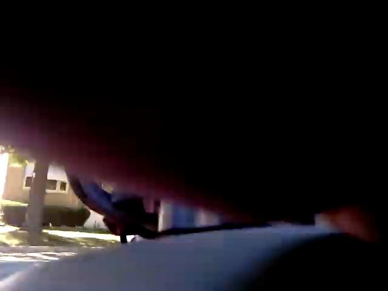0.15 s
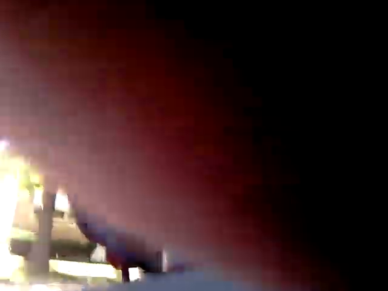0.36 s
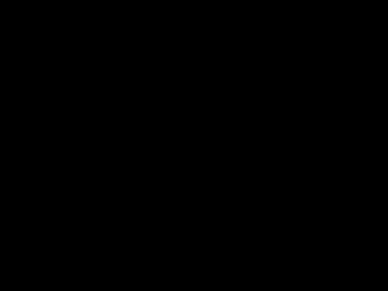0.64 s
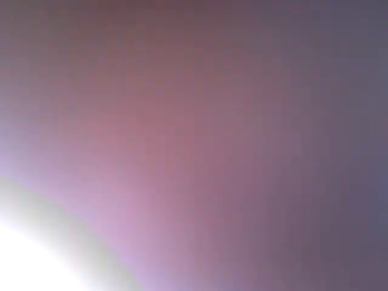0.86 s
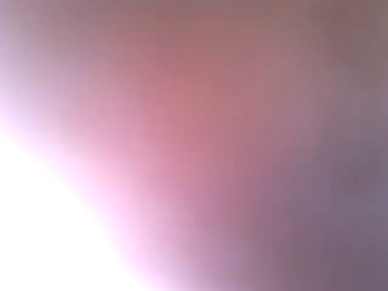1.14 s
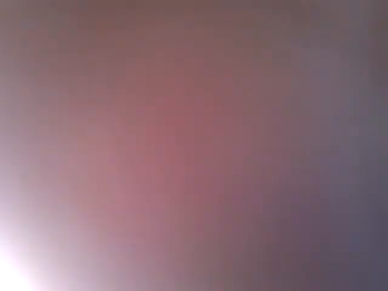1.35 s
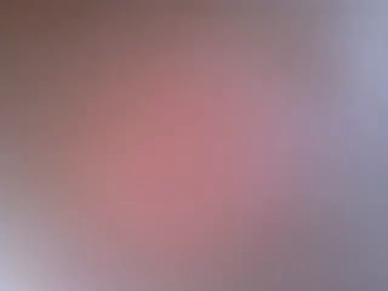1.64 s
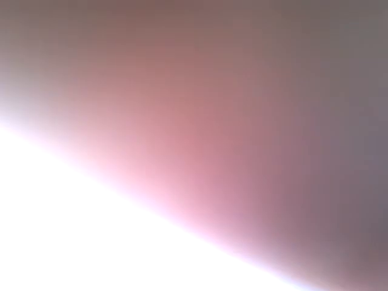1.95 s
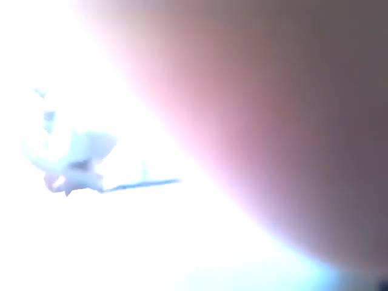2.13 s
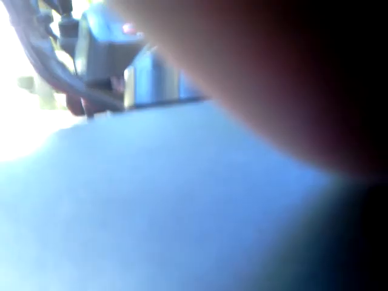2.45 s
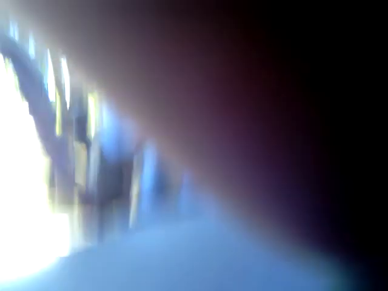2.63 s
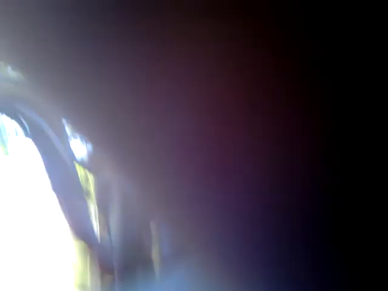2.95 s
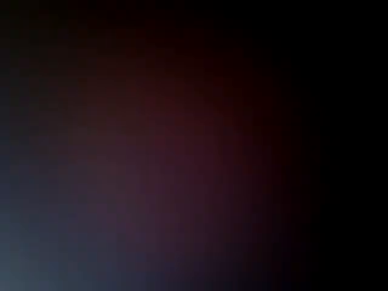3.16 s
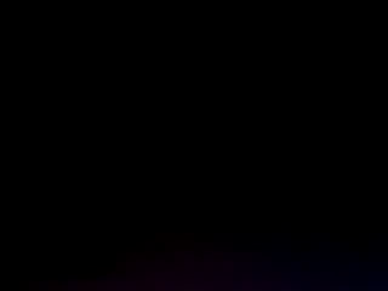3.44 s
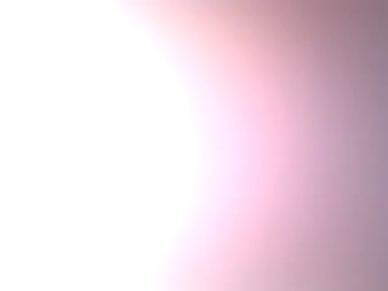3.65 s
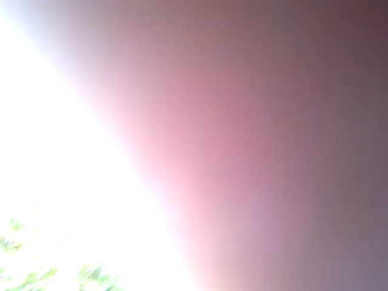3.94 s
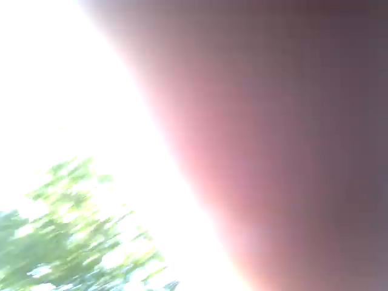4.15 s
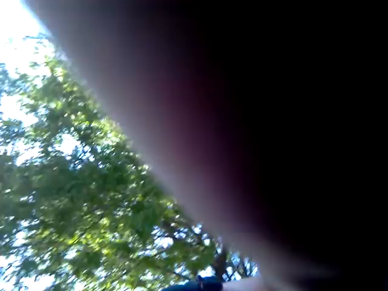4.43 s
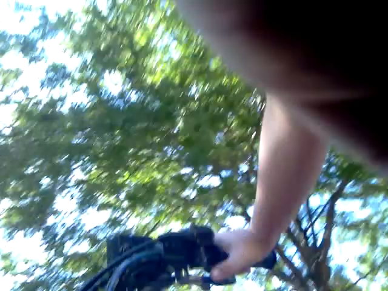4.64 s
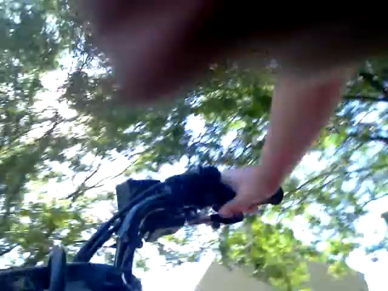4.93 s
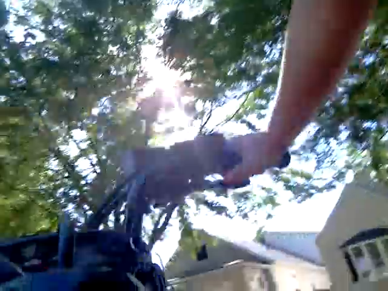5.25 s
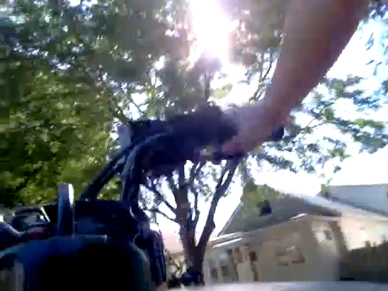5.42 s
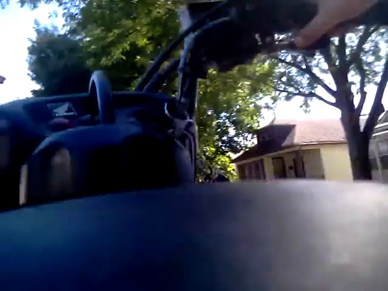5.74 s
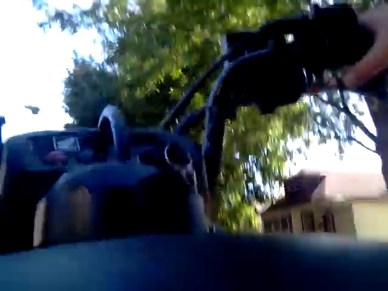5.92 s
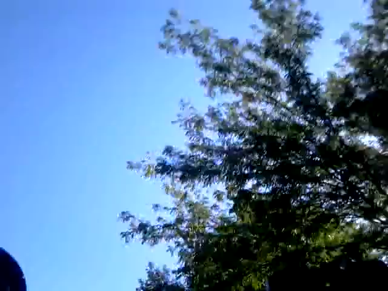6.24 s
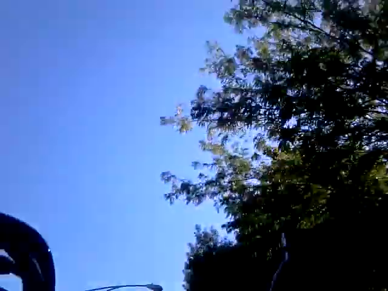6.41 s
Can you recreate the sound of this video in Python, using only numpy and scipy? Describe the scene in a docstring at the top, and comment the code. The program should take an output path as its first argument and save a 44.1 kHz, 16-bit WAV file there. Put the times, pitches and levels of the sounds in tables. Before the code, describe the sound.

Lumpy four-stroke quad idle outdoors, throttle blips and a rising barking rev, with fingers bumping and rubbing a cheap, overloading microphone.

```python
"""A single-cylinder four-stroke quad idles outdoors, is blipped once, then revs up and pulls away.
Each firing excites silencer and tailpipe resonances, and noise bursts roughen its bark.
Crank harmonics shake the bodywork; noise and pulses through resonances make the valve gear clatter.
A small narrow-band camera is handled close by: shaped noise rubs and scrapes, and dying tones knock.
Loud moments overload its input, which clips, folds and fizzes."""
import sys
import numpy as np
from scipy import signal
from scipy.fft import rfft, irfft, next_fast_len
from scipy.io import wavfile
from scipy.ndimage import uniform_filter1d, minimum_filter1d, map_coordinates

SR = 44100
rng = np.random.default_rng(int(sys.argv[2]) if len(sys.argv) > 2 else 0)


def unload_wav(signal):
    """Save mono or channel-first audio to the path in sys.argv[1] as 16-bit WAV at rate SR, clipped to [-1, 1]."""
    wavfile.write(
        sys.argv[1],
        SR,
        np.round(np.clip(np.atleast_2d(signal).T, -1, 1) * 32767).astype(np.int16),
    )


N = 290178  # length [samples]

# tailpipe resonances: (centre [Hz], width [Hz], level [dB])
TAILPIPE_MODES = [(80, 14, -9), (132, 22, -4), (161, 12, 0)]
# intake airbox resonances: (centre [Hz], width [Hz], level [dB])
AIRBOX_MODES = [(692, 23, 8.5), (1446, 30, 12.5), (2150, 14, 10.5), (2330, 31, 9.5), (2770, 40, -4),
                (2810, 33, 0), (3195, 150, 1)]
# spectrum of the clatter and intake rush: (frequency [Hz], level [dB per Hz])
RATTLE_SPECTRUM = [(150, -38), (450, 4), (750, 3), (1050, 3), (1700, -0.5), (2300, -3), (3000, 0),
                   (3700, -5), (5000, -10.5)]


def amp(db):
    """Decibels to gain."""
    return 10 ** (np.asarray(db) / 20)


def unit(x):
    """Scaled to rms 1."""
    return x / np.sqrt(np.mean(x ** 2) + 1e-20)


def steady(x):
    """Held near rms 1 over a sliding fraction of a second, whatever the firing rate."""
    power = uniform_filter1d(uniform_filter1d(x * x, size=SR // 5), size=SR // 5)
    return x / np.sqrt(np.abs(power) + 1e-20)


def curves(rows):
    """One value per sample for each column after the time."""
    s, *cols = np.transpose(rows)
    return [np.interp(np.arange(N) / SR, s, c) for c in cols]


def wobble(rate):
    """A smooth random curve, rate knots a second."""
    knots = rng.standard_normal(int(N * rate / SR) + 4)
    return map_coordinates(knots, [np.arange(N) * rate / SR])


def filtered(x, response):
    """x times a complex response of frequency."""
    m = next_fast_len(N + SR // 2)
    return irfft(rfft(x, m) * response(np.fft.rfftfreq(m, 1 / SR)), m)[:N]


def soft(x, hz):
    """x through a gentle low-pass without phase shift, 6 dB down at hz."""
    return filtered(x, lambda f: 1 / (1 + (f / hz) ** 4))


def coloured(x, points):
    """x through a spectrum of (Hz, dB) points."""
    f, db = np.transpose(points)
    return filtered(x, lambda hz: amp(np.interp(np.log(hz + 1), np.log(f), db)))


def ring(x, modes):
    """x through a set of resonances of alternating sign."""
    def response(f):
        total = 0
        for k, (hz, width, db) in enumerate(modes):
            damping = 1j * f * width
            total = total + (-1) ** k * amp(db) * damping / (hz * hz - f * f + damping)
        return total
    return filtered(x, response)


def pulses(cycle, at, scatter_db, jitter):
    """One impulse per cycle at the given fraction of it, uneven in size and timing [s]."""
    beats = np.arange(np.ceil(cycle[-1]))
    size, shift = rng.standard_normal((len(beats), 2)).T
    where = np.interp(beats + at, cycle, np.arange(N)) + jitter * SR * shift
    return np.bincount(np.clip(where, 0, N - 1).astype(int), amp(scatter_db * size), N)


def puffs(train, t60):
    """Every impulse lets out a dying burst of turbulence."""
    envelope = signal.lfilter([1], [1, -amp(-60 / (t60 * SR))], train)
    return unit(envelope * rng.standard_normal(N))


def baffled(train, t60):
    """Echoes between the silencer's baffles smear every pulse alike, nearly keeping its colour."""
    t = np.arange(SR // 8) / SR
    echoes = rfft(rng.standard_normal(len(t)) * amp(-60 * t / t60))
    # flattened spectrum: only the echoes' phases remain
    smear = irfft(echoes / np.abs(echoes), len(t))[:SR // 16]
    return unit(signal.fftconvolve(train, smear)[:N])


def exhaust(cycle, speed, boom_db, drone_db, bark_db):
    """Each blow-down rings the silencer and tailpipe; its gas jet roughens the higher resonances."""
    # silencer resonances: (centre [Hz], width [Hz], level [dB])
    silencer_modes = [(88.2, 12, 2.5), (109, 12, -11.5)]
    # broad second chamber that rounds off each thump: (centre [Hz], width [Hz], level [dB])
    outlet_modes = [(97, 44, 0)]
    # bark resonances, which change with the gas flow:
    # (centre [Hz], width [Hz], level at low speed [dB], level at high speed [dB])
    bark_modes = [(189, 79, -3.5, 1), (283.4, 56, 3, 3), (341.8, 47, 2.5, 1), (426, 26.5, 0, 3.5),
                  (575, 160, -5.5, -8), (683.5, 90, -4, -5), (930, 620, -13.5, -13.5)]
    hot_lead = .08  # hot gas leaves this share of a cycle earlier
    echo_s, echo_db = .0106, -3
    stroke_hz = 480  # well above this the bark is turbulence; below, turbulence grows with speed

    effort = np.clip((speed - 10) / 16, 0, 1)
    heat = np.clip((speed - 10) / 6, 0, 1)
    fast = np.clip((speed - 19) / 6, 0, 1)
    stroke = cycle + hot_lead * heat
    fire = pulses(stroke, at=-.1, scatter_db=1.2, jitter=.00014)
    # the piston pushes out the rest
    sweep = pulses(stroke, at=.4, scatter_db=1.5, jitter=.00015)

    push = amp(-15.0) * puffs(fire, t60=0.37) - unit(fire)
    # hotter gas raises the silencer's note
    hot_modes = [(hz * 1.161, width, db) for hz, width, db in silencer_modes]
    chamber = ring(push * (1 - heat), silencer_modes) + ring(push * heat, hot_modes)
    boom = steady(soft(ring(chamber, outlet_modes), hz=300))

    pipe_push = baffled(fire + effort * sweep / 3, t60=.08) + amp(-14) * puffs(fire, t60=.1)
    drone = steady(soft(ring(pipe_push, TAILPIPE_MODES), hz=330))

    # at low effort each chug comes back once from the end of the pipe
    returned = filtered(fire * (1 - effort),
                        lambda f: amp(echo_db) * np.exp(-2j * np.pi * f * echo_s))
    strokes = baffled(fire + returned, t60=.11)
    strokes = strokes + amp(-4.5) * effort ** 2 * baffled(sweep, t60=.1)

    # every firing tears the gas differently; with speed a continuous jet joins the puffs
    jet = pulses(cycle, at=-.05, scatter_db=2, jitter=.001)
    gas = amp(-4 + 2 * fast) * puffs(jet, t60=.11) + amp(-14 + 9 * fast) * rng.standard_normal(N)
    flow = soft(strokes, stroke_hz) + gas - (.8 - .35 * fast) * soft(gas, stroke_hz)
    slow_modes = [(hz, width, low_db) for hz, width, low_db, _ in bark_modes]
    fast_modes = [(hz, width, high_db) for hz, width, _, high_db in bark_modes]
    voiced = ring(flow * (1 - fast), slow_modes) + ring(flow * fast, fast_modes)
    bark = steady(coloured(voiced, [(120, -23), (200, 0.5), (290, 0), (800, 0.5),
                                    (1600, -27.5), (3500, -6)]))
    return amp(boom_db) * boom + amp(drone_db) * drone + amp(bark_db + wobble(14)) * bark


def shake(cycle, speed, level_db):
    """The crank turns twice per firing and jolts the frame once a turn, harder where the camera rests."""
    # the camera rests on the shaking bodywork
    press_start_s, press_end_s, press_ramp_s, press_db = 5.51, 5.95, .16, 17.3
    chatter_db, chatter_t60_s = -21.5, .014
    # loose panels: a steady rumble, a part that grows with the shake, and its rise when pressed
    rumble_db, under_shake_db, rumble_pressed_db = -34.5, -2.5, 9

    t = np.arange(N) / SR
    pressed = np.clip(np.minimum(t - press_start_s, press_end_s - t) / press_ramp_s, 0, 1)
    crank = 4 * np.pi * (cycle - .15)
    # with speed the second order takes over; pressing sharpens the jolt with higher orders
    fast = np.clip((speed - 19) / 6, 0, 1)
    jolt = amp(2 - 3.5 * fast * (1 - pressed)) * np.cos(crank)
    jolt += amp(-1 + 4.5 * fast) * np.cos(2 * crank)
    jolt += amp(-11 + 4 * pressed) * np.cos(3 * crank)
    jolt += amp(-15) * pressed * np.cos(4 * crank)
    jolt_db = level_db + press_db * pressed + 0.53 * (1 - pressed) * wobble(14)

    rumble = unit(coloured(rng.standard_normal(N), [(10, -29.5), (35, -3.5), (62, 3),
                                                    (140, 0), (300, -23)]))
    rumble_gain = amp(rumble_db) + amp(level_db + under_shake_db + rumble_pressed_db * pressed)
    # the pressed shell taps the bodywork near the top of every jolt
    taps = pulses(2 * cycle, at=.27, scatter_db=2, jitter=.0003)
    chatter = amp(chatter_db) * pressed * puffs(taps, chatter_t60_s)
    return amp(jolt_db) * jolt + chatter + rumble_gain * rumble


def clatter(cycle, speed, level_db):
    """The intake rings the airbox ahead of each firing; with speed chain and gears ring the casing more."""
    # engine block resonances: (centre [Hz], width [Hz], level [dB])
    casing_modes = [(1210, 300, -7.5), (1420, 13, 8.5), (1910, 14, 12), (2384, 37, 14), (2746, 73, 8),
                    (3020, 38, 6.5), (3360, 26, 3)]
    # parts of the clatter, and their change at high speed
    rush_db, casing_db, casing_fast_db, airbox_db, airbox_fast_db = 0.5, -17, 9.5, -8, -3.5

    fast = np.clip((speed - 18) / 8, 0, 1)
    gulps = puffs(pulses(cycle, at=.71, scatter_db=2, jitter=.0006), t60=.07)
    gears = baffled(pulses(cycle, at=.9, scatter_db=1, jitter=0), t60=.2)
    chain = unit(rng.standard_normal(N) * amp(2.1 * wobble(350)))
    mixture = chain + amp(-5) * gears + amp(-6 - 4 * fast) * gulps
    rush = steady(coloured(mixture, RATTLE_SPECTRUM))
    casing = steady(ring(gears + amp(2) * chain, casing_modes))
    airbox = steady(ring(gulps + amp(-3) * chain, AIRBOX_MODES))
    return amp(level_db) * (amp(rush_db) * rush
                            + amp(casing_db + casing_fast_db * fast) * casing
                            + amp(airbox_db + airbox_fast_db * fast) * airbox)


def at_speed(speed):
    """The level of each engine part [dB] at this firing rate."""
    # mix against revs: (firing rate [1/s], silencer boom [dB], tailpipe drone [dB],
    # exhaust bark [dB], crank shake [dB], clatter [dB])
    part_levels = [(9.58, -32, -41.5, -40.5, -52, -43), (11.46, -30, -35, -34, -36.5, -38),
                   (18.63, -20.5, -32.5, -23.5, -34.5, -34), (26.64, -23.5, -29, -18, -28, -28),
                   (29, -31.5, -34, -15.5, -26, -29), (36.8, -18, -48, -16, -23, -27)]
    rates, *cols = np.transpose(part_levels)
    return [np.interp(speed, rates, c) for c in cols]


def engine():
    """Speed and throttle set the level of every part; the camera's place shifts their balance."""
    # idle, one blip, a run-up, a sag and the pull away: (time [s], firing rate [1/s])
    speed_curve = [(0, 11.86), (.2, 10.77), (1.24, 8.9), (1.38, 19.05), (1.6, 20.45), (1.99, 10.27),
                   (2.64, 9.33), (2.78, 17.29), (2.98, 19.12), (3.66, 18.88), (4.28, 26.57), (4.97, 26.83),
                   (5.42, 24.13), (5.66, 23.58), (5.95, 21.04), (6.11, 26.81), (6.58, 36.95)]
    # the camera is carried past the tailpipe: (time [s], nearness [0-1])
    near_curve = [(4.28, 0), (4.7, 0.9), (5.65, 0.92), (6.1, 0.36)]
    # clatter offset as the hand covers and uncovers the microphone: (time [s], level [dB])
    cover_curve = [(0, 3), (1.1, -0.5), (1.55, 5), (2.85, 1), (3.4, 7.5), (4.35, 4), (4.75, -7.5),
                   (5.45, -5), (5.95, 1), (6.15, 8)]
    throttle_lead_s = 0.053  # the exhaust follows the throttle, this far ahead of the speed
    # level changes at nearness 1
    near_boom_db, near_drone_db, near_bark_db, near_shake_db = -2, 12, -1, 5.5
    in_tune_db = 5.5  # the near tailpipe sings when the sixth firing harmonic meets its note

    speed, near, cover_db = curves(speed_curve)[0], curves(near_curve)[0], curves(cover_curve)[0]
    cycle = np.cumsum(speed) / SR  # one firing per cycle
    throttle = speed + throttle_lead_s * uniform_filter1d(np.gradient(speed) * SR, size=SR // 16)
    boom_db, drone_db, bark_db, _, _ = at_speed(throttle)
    *_, shake_db, clatter_db = at_speed(speed)
    note, width, _ = TAILPIPE_MODES[-1]
    in_tune = 1 / (1 + (2 * (6 * speed - note) / width) ** 2)
    pipe = exhaust(cycle, speed, boom_db + near_boom_db * near,
                   drone_db + near * (near_drone_db + in_tune_db * in_tune),
                   bark_db + near_bark_db * near)
    body = shake(cycle, speed, shake_db + near_shake_db * near)
    return pipe + body + clatter(cycle, speed, clatter_db + cover_db)


def ticks():
    """Small contacts at uneven moments while the grip shifts, as rows like the knocks."""
    # flurries of ticks: (start [s], end [s], level [dB], pitch [Hz])
    fumbles = [(0.052, .19, -12.5, 535), (2.074, 2.42, -11, 383), (3.18, 3.43, -24, 1080)]
    gap_s, t60_s, scatter_db = .022, .006, 3
    rows = []
    for start, end, db, hz in fumbles:
        draws = rng.standard_normal(size=(32, 3))
        for s, (late, size, tone) in zip(np.arange(start, end, gap_s), draws):
            rows.append((s + late * gap_s / 4, db + scatter_db * size, hz * 2 ** (tone / 4), t60_s))
    return rows


def knocks():
    """Each contact or engine thump is a short, dead ring and a crack; higher-pitched ones crack more."""
    # knocks on the camera shell; the low thumps at 4.555 and 4.897 s are engine peaks
    # overloading the input: (time [s], level [dB], pitch [Hz], t60 [s])
    hits = [(.706, 1, 270, 0.0046), (.737, -19, 256, 0.12), (.893, 2, 340, 0.009), (1.982, 2.5, 510, 0.027),
            (1.986, 11.5, 225.4, 0.02), (1.992, -3.5, 121, 0.054), (2.09, -18, 900, .014),
            (2.146, -3, 885, 0.0025), (2.149, -23, 370, 0.11), (2.226, -10, 750, 0.0025),
            (2.244, -18, 1390, 0.0049), (2.259, -15.5, 1190, 0.0058), (2.275, -5, 605, 0.0046),
            (2.29, -16, 1020, 0.0085), (2.294, -4.5, 554, 0.0078), (2.305, -5, 566, .008),
            (2.313, -5, 570, 0.0081), (2.329, -14, 910, 0.0057), (2.354, -5, 880, 0.0026),
            (3.192, -10.5, 600, 0.022), (3.243, -13, 1300, 0.0024), (3.288, -1, 1980, 0.0034),
            (3.402, -5, 1460, 0.0069), (3.495, 10.5, 464, 0.01), (3.533, 8.5, 664, 0.0076),
            (3.543, -30.5, 3450, 0.024), (3.56, 7.5, 96.4, 0.013), (3.733, -3, 570, 0.029),
            (3.743, -5.5, 480, 0.044), (4.555, -1, 200, 0.01), (4.897, -5, 131, 0.023),
            (5.711, 3, 900, 0.0055), (5.753, 1.5, 1100, 0.011), (5.849, -21.5, 3300, 0.011),
            (6.129, -1, 3340, 0.0031)]
    crack_db, crack_db_per_octave = 4, 10.5  # crack noise over ring for a 1 kHz hit
    out, t = np.zeros(N + SR), np.arange(SR // 8) / SR
    for s, db, hz, t60 in list(hits) + ticks():
        octaves = np.log2(hz / 1000)
        crack = amp(crack_db + crack_db_per_octave * octaves) * rng.standard_normal(len(t))
        burst = -np.sin(2 * np.pi * hz * t) + crack
        envelope = amp(db - 60 * t / t60) * (1 - np.exp(-t / 0.00039))
        out[round(s * SR):][:len(t)] += envelope * burst
    return out[:N]


def rubs():
    """Skin sticks and slips on the plastic shell in a fine, uneven grain."""
    # fingers sliding over the camera: (start [s], end [s], level [dB], swell from start to end [dB])
    strokes = [(0.438, 0.763, -31, -7), (0.787, 0.911, -21.5, 5), (1.931, 2.136, -29, -21),
               (2.435, 2.71, -33, -10.5), (3.226, 3.425, -23, 7), (4.561, 4.754, -16.5, -11.5),
               (4.793, 4.874, -23.5, -29), (5.431, 5.516, -24, 1.5), (5.56, 5.657, -20.5, 22),
               (5.663, 5.848, -24.5, -7), (5.835, 6.033, -15, 3.5)]
    # spectrum of the rub: (frequency [Hz], level [dB per Hz])
    skin_spectrum = [(60, -37.5), (250, 1), (700, -4), (1500, -5.5), (2500, -3), (3500, -1.5),
                     (5000, -10.5)]
    t, pressure = np.arange(N) / SR, np.zeros(N)
    for start, end, db, swell_db in strokes:
        u = np.clip((t - start) / (end - start), 0, 1)
        pressure += amp(db + swell_db * (u - .5)) * np.abs(np.sin(np.pi * u)) ** 0.8
    grain = rng.standard_normal(N) * amp(1.8 * wobble(500) + 0.4 * wobble(31))
    return pressure * unit(coloured(grain, skin_spectrum))


def snaps():
    """The throttle snaps open: the first intake strokes suck hard through the airbox."""
    # hard intake strokes: (time [s], level [dB])
    gasps = [(1.267, -27), (1.338, -17)]
    t60_s = 0.077
    t, air = np.arange(N) / SR, rng.standard_normal(N)
    draw = sum((t >= s) * amp(db - 60 * np.abs(t - s) / t60_s) for s, db in gasps)
    return draw * unit(unit(coloured(air, RATTLE_SPECTRUM)) + unit(ring(air, AIRBOX_MODES)))


def skids():
    """The shell judders across the bodywork: a hard contact skips over many tiny catches."""
    # short scrapes: (start [s], length [s], level [dB], pitch [Hz])
    scrapes = [(1.98, .012, -10.5, 1023), (2.742, 0.0038, -11, 1530), (3.368, 0.0075, -18.5, 1100),
               (3.4895, 0.0104, 1, 3200), (3.7305, 0.014, -3, 1140), (4.029, .008, -11.5, 1700),
               (5.71, 0.0038, -0.5, 1915), (5.752, .007, -6, 1700), (6.085, 0.062, -21, 1053)]
    width, rise = 0.63, 0.2  # resonance width over its pitch; rise as a share of the length
    t, out = np.arange(N) / SR, np.zeros(N)
    catches = rng.standard_normal(N) * amp(1.8 * wobble(900))
    for s, length, db, hz in scrapes:
        u = (t - s) / length
        force = np.sqrt(np.clip(np.minimum(u / rise, 1 - u), 0, 1))
        out += amp(db) * force * unit(ring(catches, [(hz, width * hz, 0)]))
    return out


def squeak():
    """A fingertip slips on the plastic in one short, rough, rising blip."""
    start_s, length_s, level_db, from_hz, to_hz = 5.071, 0.024, -17, 1210, 1380
    u = np.clip((np.arange(N) / SR - start_s) / length_s, 0, 1)
    hz = from_hz + (to_hz - from_hz) * u
    phase = 2 * np.pi * np.cumsum(hz) / SR + 0.5 * wobble(800)
    return amp(level_db) * np.sin(np.pi * u) ** 2 * np.sin(phase)


def scene():
    """The running engine, with the handling of the camera on top."""
    return (engine() + snaps() + rubs() + knocks() + skids() + squeak())[None]


def limited(x, clip_level):
    """A quick limiter with a 2 dB range tames the mild peaks only."""
    needed = np.clip(amp(-1) * clip_level / (np.abs(x) + 1e-9), amp(-2), 1)
    return x * uniform_filter1d(minimum_filter1d(needed, size=SR // 300), size=SR // 300)


def record(dry):
    """The camera hears a telephone-like band; overloads clip, alias in its slow converter and fizz."""
    # spectrum of the overload fizz: (frequency [Hz], level [dB per Hz])
    fizz_spectrum = [(3000, -20), (5000, 2), (6500, -9.5), (8000, 4.5), (9500, -12.5), (15000, -18.5)]
    band_hz, converter_hz, top_hz = 3720, 8000, 15850
    clip_level, fizz_db = .7, -31.5

    banded = filtered(dry[0], lambda hz: 1 / np.sqrt((1 + (hz / band_hz) ** 64)
                                                     * (1 + (hz / band_hz) ** 26)))
    narrow = limited(banded, clip_level)
    # sampling mirrors the clipped sound about the converter rate; the low-pass keeps what folds back
    sampler = 1 + 2 * np.cos(2 * np.pi * converter_hz * np.arange(N) / SR)
    sampled = np.clip(narrow, -clip_level, clip_level) * sampler
    converted = filtered(sampled, lambda hz: 1 / np.sqrt(1 + (2 * hz / converter_hz) ** 160))
    # the second clipping crackles above the band
    clipped = np.clip(converted, -clip_level, clip_level)
    voiced = coloured(clipped, [(4000, -0.5), (5000, 6.5), (6500, 1.5), (8000, 5.0),
                                (10000, -0.5), (15000, -4.0)])

    over = 1. * (np.abs(narrow) > clip_level)
    overload = uniform_filter1d(uniform_filter1d(over, size=SR // 200), size=SR // 130)
    hiss = rng.standard_normal(N) * amp(4 * wobble(700))
    fizz = amp(fizz_db) * overload * unit(coloured(hiss, fizz_spectrum))
    return filtered(voiced + fizz, lambda hz: hz < top_hz)[None]


dry = scene()
out = record(dry)
unload_wav(out)
```